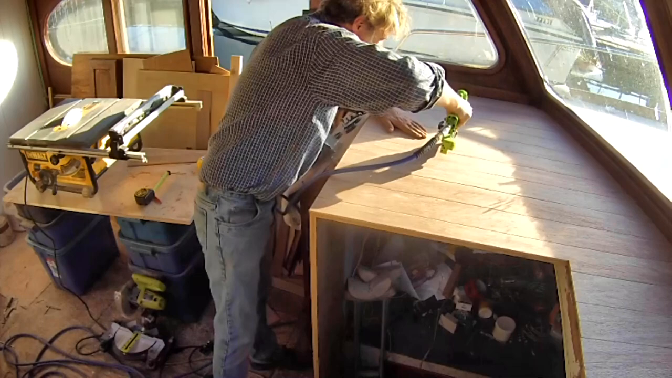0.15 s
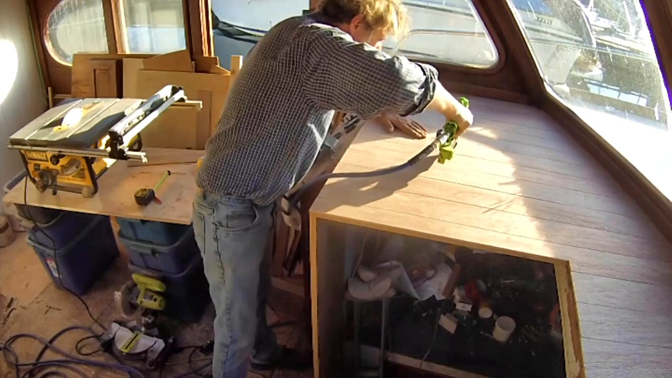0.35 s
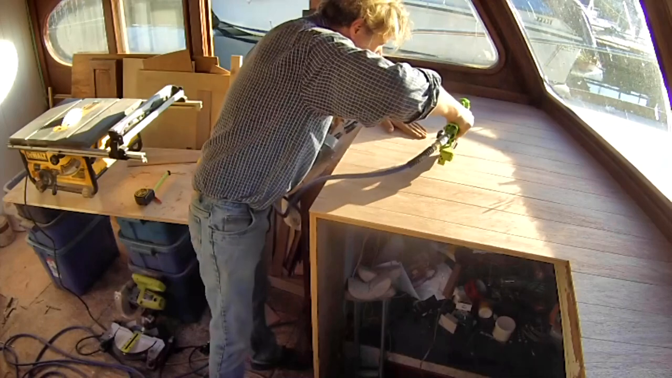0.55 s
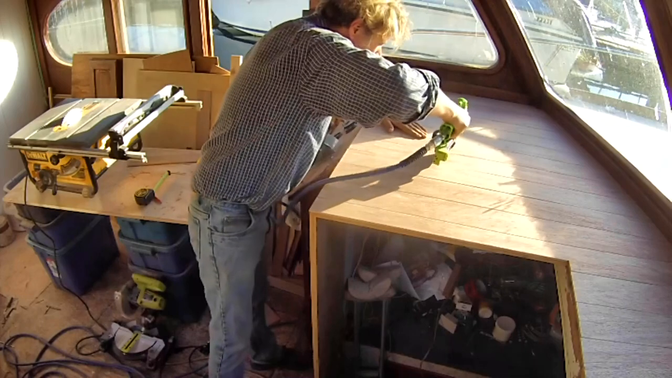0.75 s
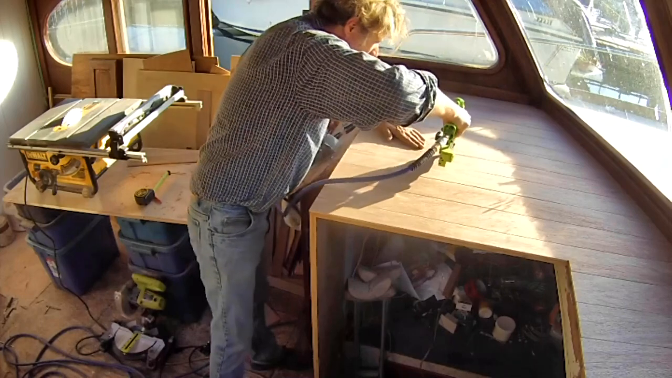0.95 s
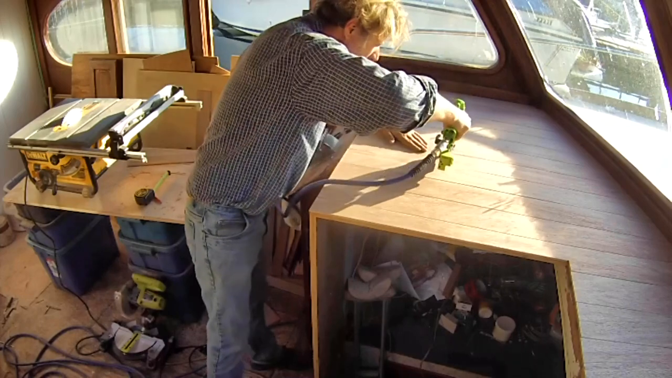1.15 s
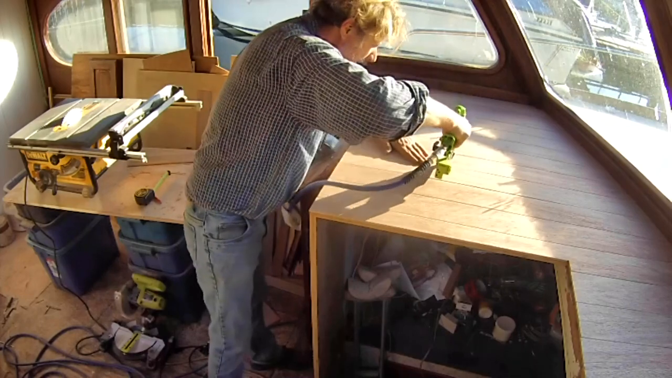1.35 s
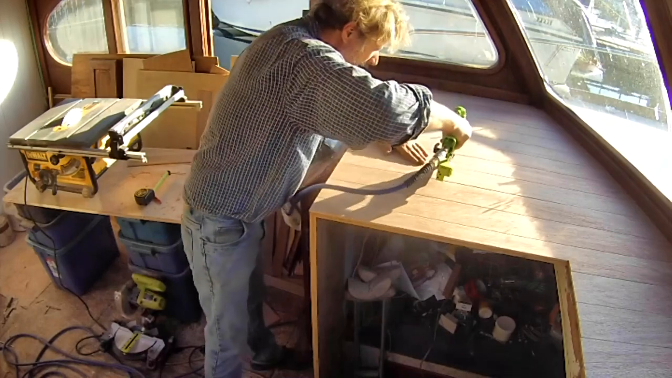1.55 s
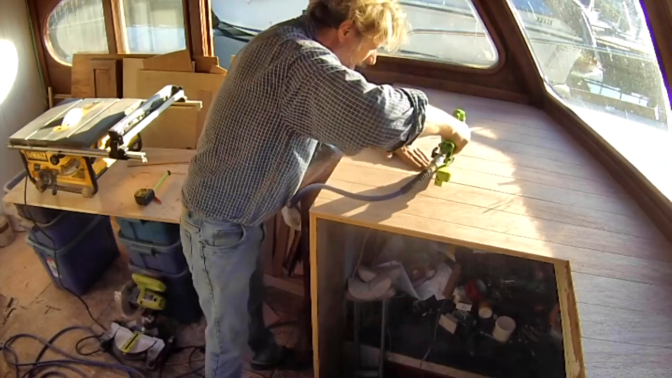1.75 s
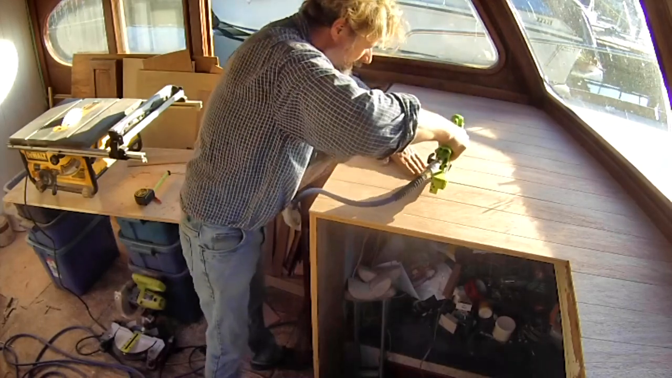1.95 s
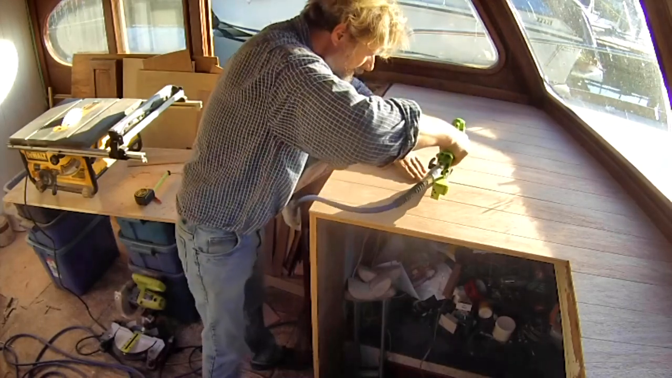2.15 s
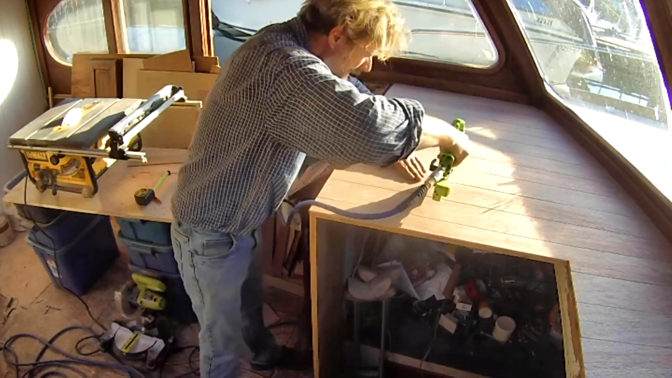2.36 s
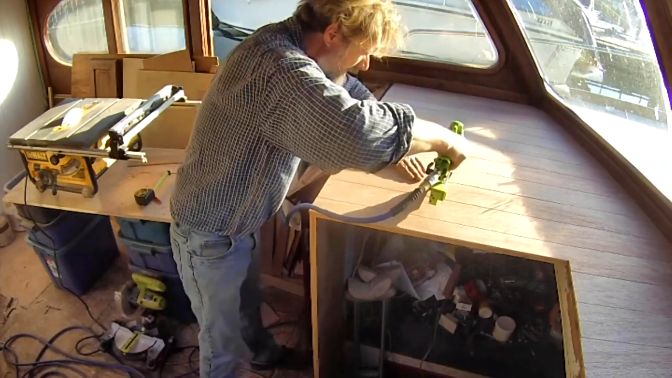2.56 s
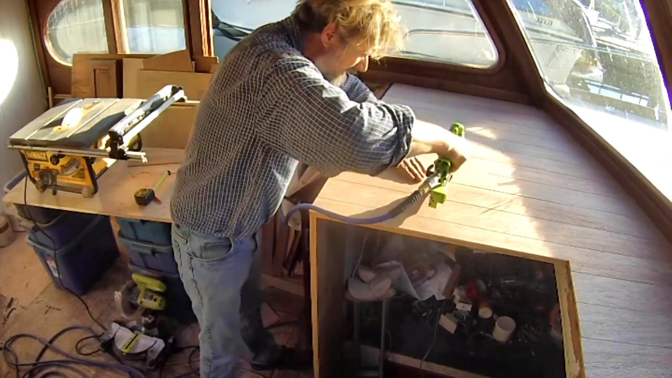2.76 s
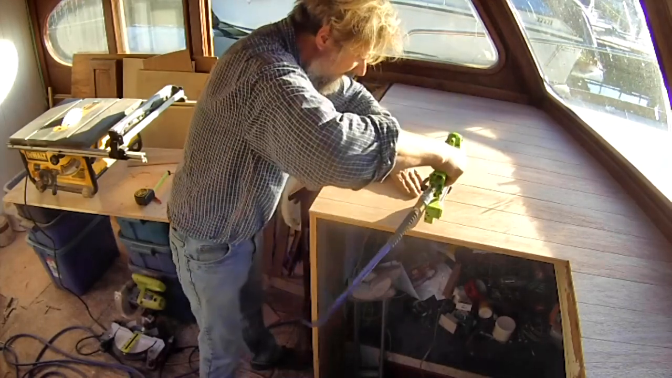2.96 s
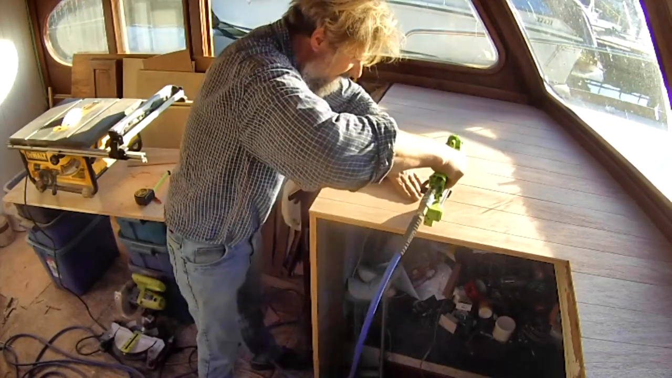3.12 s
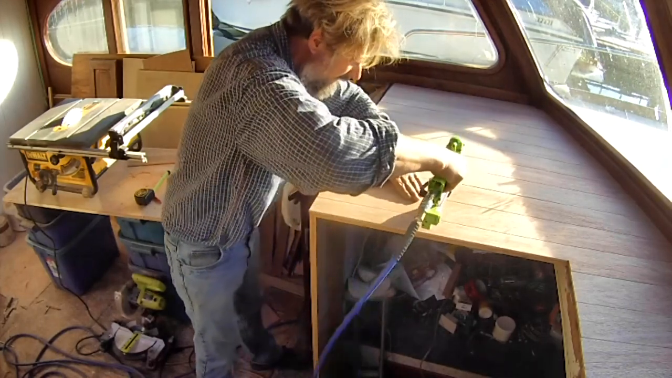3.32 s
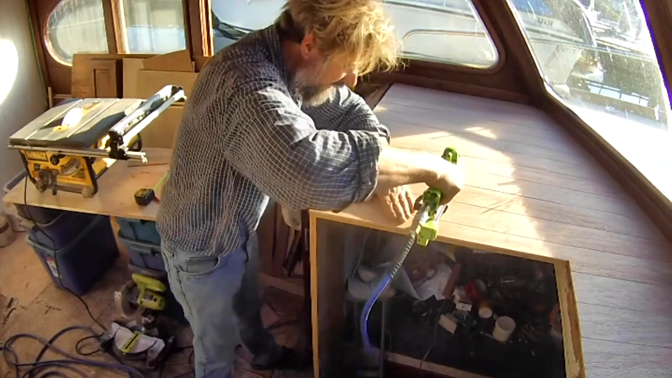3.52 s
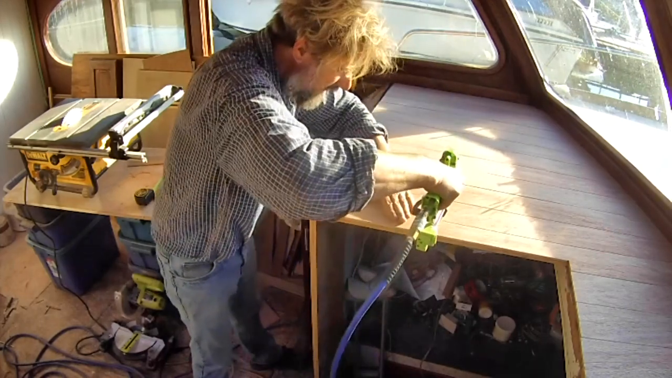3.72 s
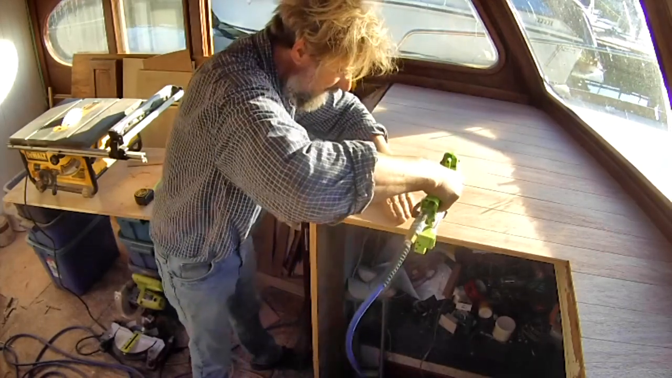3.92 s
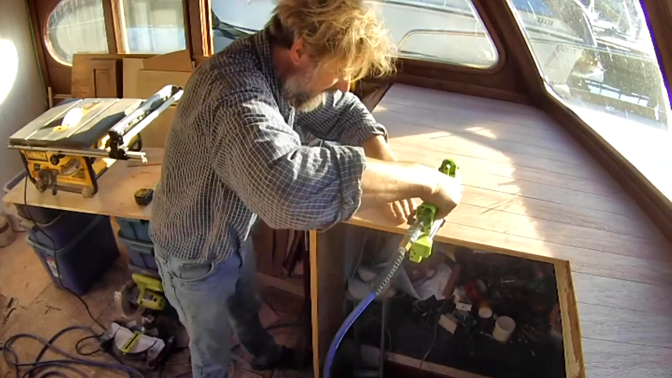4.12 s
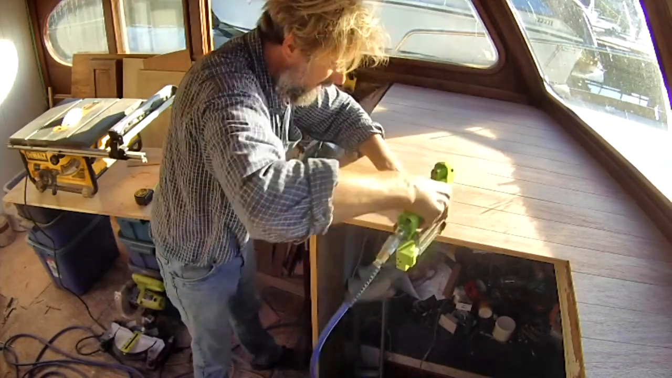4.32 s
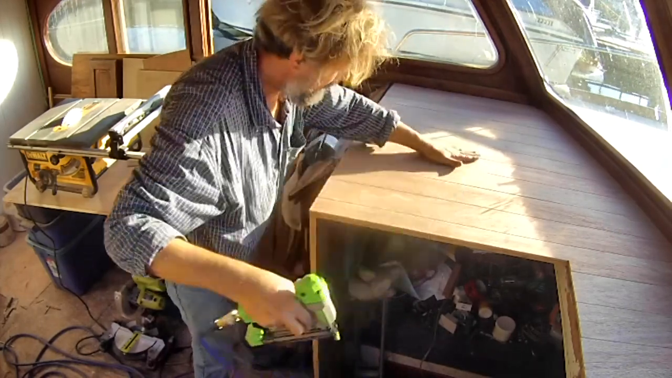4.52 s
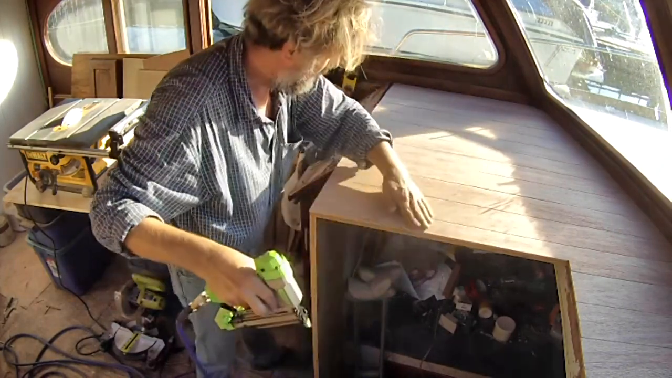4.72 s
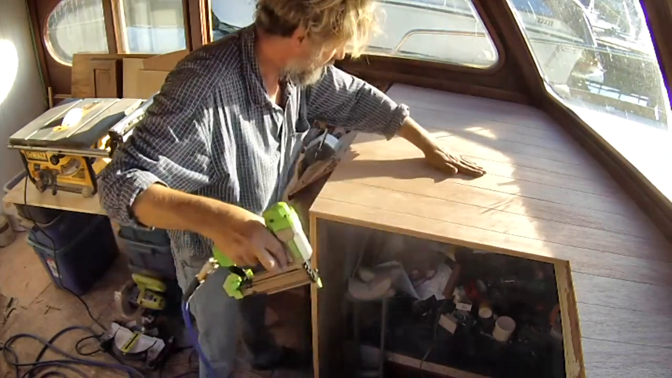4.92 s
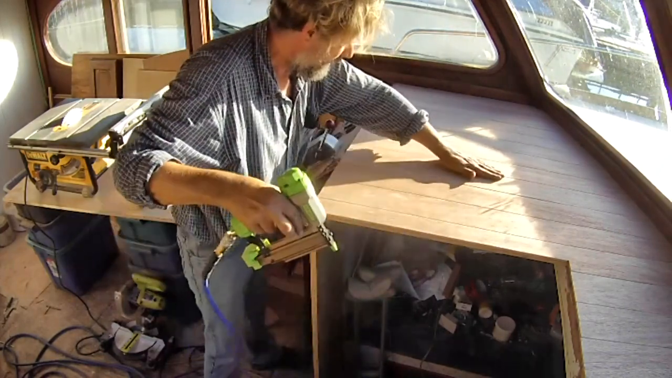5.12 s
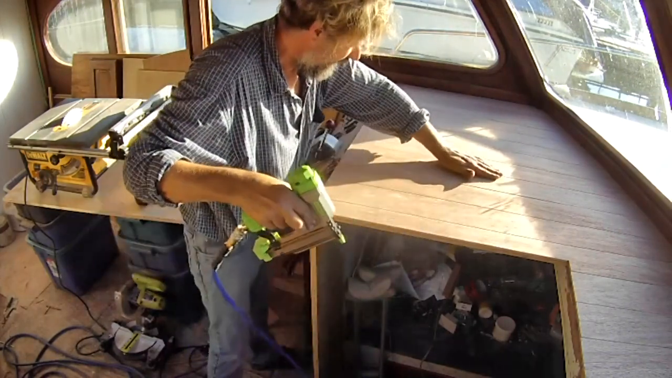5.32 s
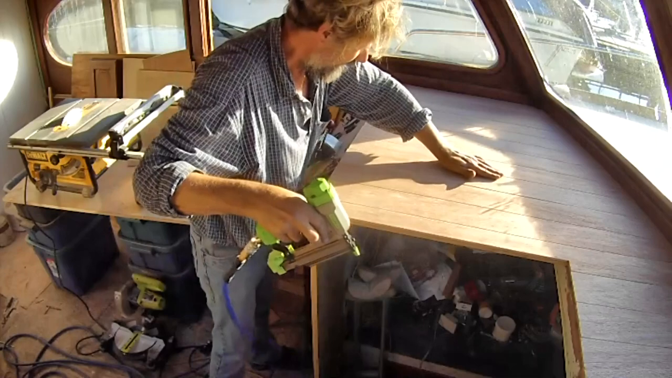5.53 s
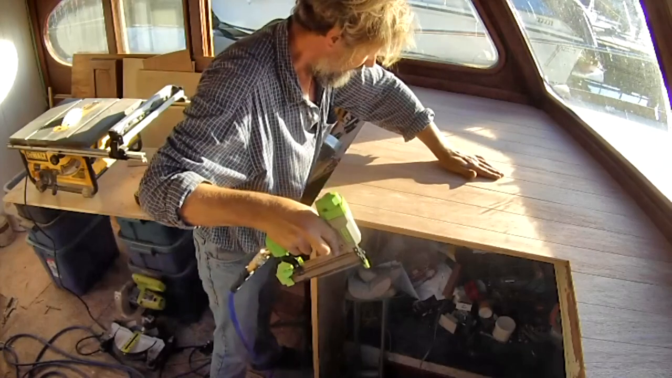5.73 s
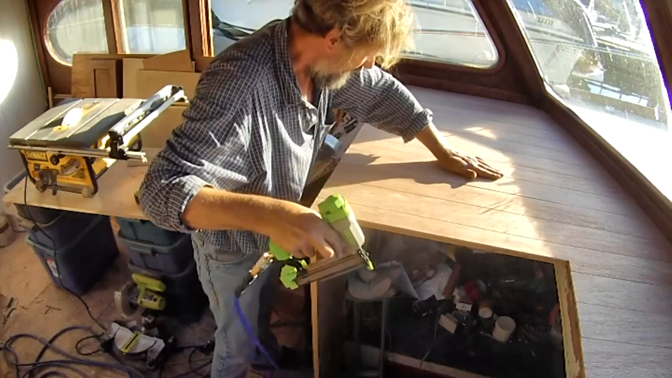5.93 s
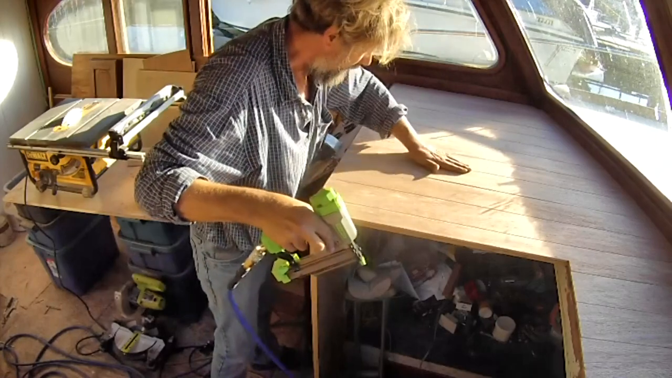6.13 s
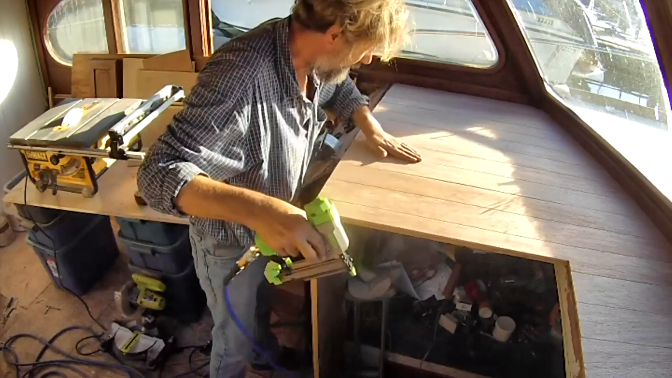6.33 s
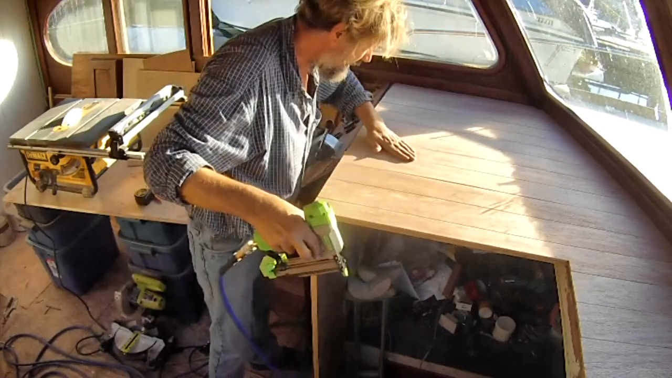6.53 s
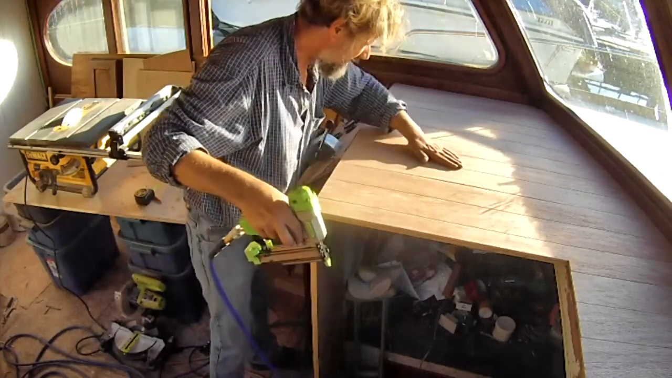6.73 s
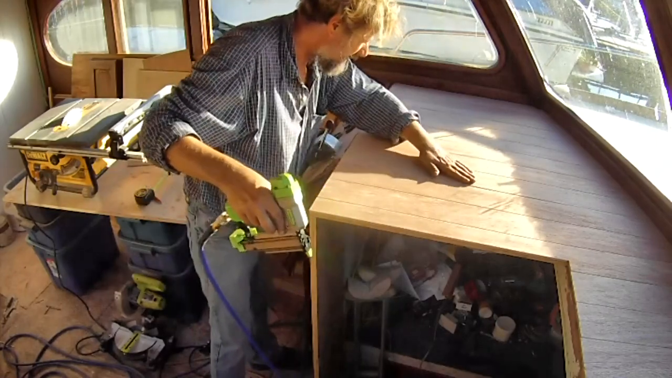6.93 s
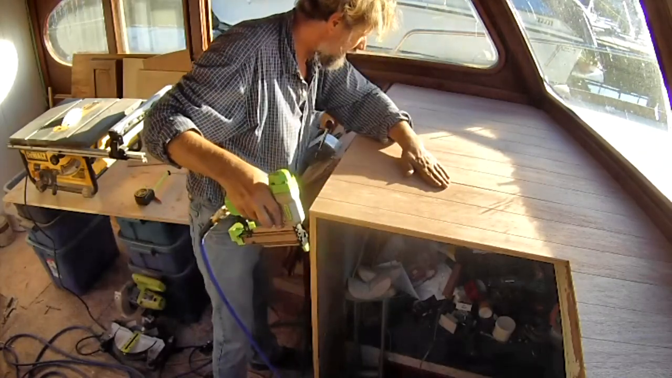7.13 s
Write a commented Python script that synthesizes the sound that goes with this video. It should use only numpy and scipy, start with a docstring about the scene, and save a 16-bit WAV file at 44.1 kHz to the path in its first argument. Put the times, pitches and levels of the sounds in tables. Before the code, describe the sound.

A small, tight-sounding boat cabin with low steady background noise; very faint, thin falling chirps come from outside during the first two seconds. It opens on the end of an air puff and a clack. At 0.2 s a pin nailer fires, then after a gap again at 0.8, 1.1, 1.5 and 1.8 s, continuing about every third of a second until 4.2 s, twelve shots in all. Each has a faint tick and air spit, a bright crack, and some 60 ms later an exhaust puff, a metallic piston clack and thin refill hiss, over short hollow wood thumps. The 1.5 s crack is weaker. A wooden bump lands at 2.2 s, and a brief scuff at 3.5 s. From 4.4 s a palm brushes the planks in uneven hissing strokes, fading near 5.5 s; a hard knock hits at 5.6 s, then soft bumps at 6.0 s and more rubbing to the end.

```python
"""A pneumatic pin nailer tacks planking onto a hollow wooden counter in a small boat cabin.
From the start: low background noise, faint outside chirps, the end of an earlier exhaust puff.
0.2 to 4.2 s: twelve shots, each a trigger tick, valve spit, driver crack, puff, piston clack and refill hiss
(filtered noise) over ringing wood modes; bumps, brief scuffs and hand shifts between some of them.
From 4.4 s: a palm sweeps over the planks as uneven noise, amid soft bumps and one hard knock at 5.6 s."""
import sys
import numpy as np
from scipy import signal
from scipy.fft import rfft, irfft, next_fast_len
from scipy.io import wavfile
from scipy.ndimage import map_coordinates

SR = 44100
rng = np.random.default_rng(int(sys.argv[2]) if len(sys.argv) > 2 else 0)


def generate_wav(sig):
    """Save sig (samples, or channels by samples) to the path in sys.argv[1] as 16-bit PCM at SR."""
    pcm = np.round(np.clip(np.atleast_2d(sig).T, -1, 1) * 32767).astype(np.int16)
    wavfile.write(sys.argv[1], SR, pcm)


N = 316354

# Levels of the hits (shots, releases, bumps) are set ahead of the trim in scene().
# Driver blows. Each row: start in seconds, crack level in dB, valve spit level in dB,
# counter thump level in dB, plank knock level in dB, plank pitch in Hz.
SHOTS = [(0.1787, -21, -36, -25.5, -31, 245), (0.8377, -24.5, -32.5, -22, -32, 370),
         (1.1309, -25.5, -32, -25.5, -30, 330), (1.513, -33.5, -30, -26.5, -32, 340),
         (1.801, -20, -30.5, -32.5, -25, 419.5), (2.2821, -20.5, -39.5, -32, -25.5, 480),
         (2.6716, -19.5, -33, -39, -27, 225), (2.9978, -21.5, -33, -31.5, -23.5, 235),
         (3.2834, -21.5, -35.5, -32.5, -23.5, 230), (3.613, -21, -39, -39, -27, 490),
         (3.913, -21, -39.5, -32, -27.5, 280), (4.242, -26.5, -32, -32.5, -22.5, 370)]
# Trigger releases. Each row: start in seconds, exhaust puff level in dB, refill hiss level in dB,
# piston return time in seconds, piston clack level in dB.
RELEASES = [(-.03, -26.5, -81.5, 0.022, -28.5), (0.239, -22.5, -49.5, 0.02, -28.5),
            (0.8963, -28.5, -52.5, .014, -26.5), (1.1861, -21.5, -51, 0.017, -23.5),
            (1.569, -30, -74, 0.016, -24), (1.859, -20, -45, 0.017, -28),
            (2.3371, -24.5, -59, .0234, -23.5), (2.728, -23, -42.5, 0.018, -29),
            (3.0558, -30, -65.5, 0.014, -24.5), (3.34, -25, -46, 0.021, -32.5),
            (3.672, -25.5, -71.5, 0.017, -27), (3.9728, -20, -77.5, 0.018, -25),
            (4.301, -29.5, -67, 0.013, -24)]
# Bumps on the woodwork. Each row: start in seconds, thump level in dB, knock level in dB,
# rap level in dB, t60 of the rap's slow part in seconds.
BUMPS = [(.722, -34.5, -47, -55.5, 0.32), (2.2343, -32, -22.5, -29, 0.1), (2.44, -47.5, -55.5, -64.5, .12),
         (4.069, -49, -52.5, -76, .09), (4.437, -48.5, -81, -78, 0.11), (4.576, -44, -59, -60, 0.072),
         (4.623, -52, -67, -49.5, 0.055), (4.728, -70, -75, -58.5, 0.058), (5.582, -26.5, -39, -21.5, 0.23),
         (5.998, -48, -49.5, -52, 0.39), (6.06, -32.5, -58, -59, .05)]
# Palm strokes, one list of points each. Each point: time in seconds, hiss level in dB.
PALM_STROKES = [
    [(4.38, -54), (4.504, -57), (4.552, -48), (4.67, -44), (4.71, -54)],
    [(4.73, -45), (4.774, -52.5), (4.922, -39), (5.286, -63.5), (5.52, -73)],
    [(5.97, -69.5), (5.986, -69), (6.086, -45), (6.434, -45), (6.53, -56.5)],
    [(6.54, -56.5), (6.608, -45.5), (6.904, -47.5), (7.116, -44.5), (7.17, -52.5)],
]
# Brief shifts of the hand on the planks. Each row: middle in seconds, half length in seconds, level in dB.
HAND_SHIFTS = [(.648, 0.039, -68.5), (.78, .05, -72), (2.122, 0.096, -71.5)]
# Drags as the tool moves to the next pin. Each row: middle in seconds, level in dB.
SCUFFS = [(1.329, -69), (2.004, -64), (2.469, -62.5), (3.46, -49.5), (3.77, -63)]
# Faint falling chirps from outside. Each row: middle in seconds, level in dB.
CHIRPS = [(.14, -82.5), (0.369, -71), (.59, -78), (1.36, -78), (2.04, -70.5)]

# Modes of the hollow counter. Each row: frequency in Hz, relative level in dB, t60 in seconds.
COUNTER_MODES = [(56, -8, 0.2), (72, 9, 0.046), (84.4, -4.5, 0.25), (116, 0, 0.068), (126, -13, 0.2)]
# Modes of the planks. Each row: frequency in Hz, relative level in dB, t60 in seconds.
PLANK_MODES = [(202, -3.5, 0.054), (240.7, -2, 0.095), (287, -2.5, .09), (337, -3.5, 0.063),
               (383.8, -4.5, 0.062), (430.2, -6.5, 0.11), (490, -1, .1), (520, -8.5, 0.14)]
# Resonances of the nailer housing. Each row: frequency in Hz, width in Hz, boost in dB at full share.
HOUSING_PEAKS = [(743, 70, 7.5), (898, 130, 5), (1277, 29, 8), (1505, 210, 5.5), (1868, 270, 8),
                 (2240, 130, 4.5), (2750, 120, 5.5), (3240, 300, 6), (4220, 620, 4.5), (5900, 300, 0.5),
                 (6600, 1100, 2.5), (8130, 500, 3), (9600, 380, 2)]
# Decay of the cabin echo. Each row: frequency in Hz, t60 in seconds.
WALL_T60 = [(100, 0.29), (500, 0.22), (2000, 0.14), (5000, 0.13), (14000, 0.067)]

# Spectrum of the driver crack. Each row: frequency in Hz, relative density in dB per Hz.
CRACK_SPECTRUM = [(100, -9), (400, -8.5), (700, -8), (1100, -4), (2500, -5), (3400, -5.5), (4400, 0),
                  (6000, -3.5), (9000, -4.5), (11000, -10.5), (15000, -13)]
# Spectrum of escaping air. Each row: frequency in Hz, relative density in dB per Hz.
AIR_SPECTRUM = [(40, -11), (90, 11), (200, -8.5), (500, 4.5), (700, -2.5), (1300, -6.5), (2300, -0.5),
                (4800, 1), (7000, -1), (9000, -0.5), (11800, -5.5), (13700, -0.5), (15500, -9)]
# Spectrum of the piston clack. Each row: frequency in Hz, relative density in dB per Hz.
PISTON_SPECTRUM = [(60, -8.5), (250, -9), (520, -5), (1100, -4), (1850, -3.5), (2400, -5.5), (3300, 1.5),
                   (5400, 1.5), (7000, -10), (9000, -6), (11000, -18), (15000, -22.5)]
# Spectrum of the plank's dense higher modes under a shot. Each row: frequency in Hz, relative dB per Hz.
PLANK_RAP_SPECTRUM = [(60, -11.5), (180, -6.5), (300, -4.5), (520, -3), (650, -5), (1000, -9), (1800, -7),
                      (3000, -11), (6000, -17.5), (15000, -29)]
# Spectrum of the rap of a bump. Each row: frequency in Hz, relative density in dB per Hz.
BUMP_RAP_SPECTRUM = [(60, -31.5), (180, -15.5), (300, 7), (560, -2.5), (780, 1), (1050, -6.5), (1450, -0.5),
                     (2000, -8), (2700, -12), (3300, -24.5), (4800, -22), (7000, -14.5), (10000, -23.5),
                     (15000, -21)]
# Spectrum of skin on wood grain. Each row: frequency in Hz, relative density in dB per Hz.
PALM_SPECTRUM = [(200, -25.5), (700, -15), (1000, -16), (1800, -3.5), (2800, 0.5), (4600, 0), (7100, 1.5),
                 (10000, -2.5), (14200, -7), (15500, -7.5)]
# Spectrum of the counter's rumble under the hand. Each row: frequency in Hz, relative dB per Hz.
RUMBLE_SPECTRUM = [(25, -12), (55, -3), (100, -2.5), (160, -13.5), (250, -11.5), (600, -18), (1500, -19.5),
                   (4000, -40)]
# Spectrum of the low background. Each row: frequency in Hz, relative density in dB per Hz.
BACKGROUND_SPECTRUM = [(25, 1.5), (60, 0), (110, -2), (170, -10.5), (370, -16.5), (800, -20.5), (1500, -23),
                       (2600, -26.5), (6000, -35.5), (11000, -41), (15500, -45)]

TOP_HZ = 15400
HIT_S = np.arange(SR // 2) / SR  # time axis of one hit

CHIRP_HZ = 2600  # pitch at the middle of a chirp
SCUFF_HALF_S, SCUFF_HZ = 0.025, 505

# Ordinary stroke, rumble under it, dB of rumble per dB of hiss, rumble under the leaning hand.
STROKE_REF_DB, RUMBLE_DB, RUMBLE_DB_PER_DB, LEAN_DB = -45.5, -66.5, 2.2, -59.5

# Plank pitch when rap equals knock; extra rap that lifts it an octave.
BUMP_HZ, BUMP_DB_PER_OCTAVE = 241, 17

# Hard return, its tilt, tilt gained per dB; thump of the jolt, the same at every return.
CLACK_REF_DB, CLACK_TILT_DB_PER_OCTAVE, CLACK_TILT_PER_DB = -23, -0.06, 0.42
JOLT_DB = -35.5

# Brisk release: level, rise, decay, tilt; weakening that doubles the decay; tilt gained per dB.
PUFF_REF_DB, PUFF_RISE_S, PUFF_T60_S, PUFF_TILT_DB_PER_OCTAVE = -21, 0.0019, 0.061, 2
PUFF_DOUBLING_DB, PUFF_TILT_PER_DB = 10, 0.12

# Ordinary spit, lead of its tick, extra spit that doubles the lead; tick relative to spit.
SPIT_REF_DB, TICK_LEAD_S, LEAD_DOUBLING_DB, TICK_DB = -32, 0.02, 17.5, -11.5
# Full blow, its tilt, tilt gained per dB.
CRACK_REF_DB, CRACK_TILT_DB_PER_OCTAVE, CRACK_TILT_PER_DB = -18.5, -0.5, 0.17
# Plank rap under a full blow; dB of rap gained per dB of crack lost, as when a pin meets hard wood.
RAP_DB, RAP_DB_PER_DB = -26.5, 0.22


def amp(db):
    """Decibels to gain."""
    return 10 ** (np.asarray(db) / 20)


def unit(x):
    """Scale to rms 1."""
    return x / np.sqrt(np.mean(x ** 2) + 1e-20)


def packed(x):
    """Scale a hit to the energy of 10 ms at rms 1."""
    return x / np.sqrt(np.sum(x ** 2) / (SR / 100) + 1e-20)


def along(points, hz):
    """Interpolate (Hz, value) points on a log frequency axis."""
    point_hz, values = np.transpose(points)
    return np.interp(np.log(hz + 1), np.log(point_hz), values)


def fade(t60_s):
    """Exponential decay, 60 dB in t60_s."""
    return np.exp(-np.log(1000) * HIT_S / np.maximum(t60_s, 1e-3))


def swell(rise_s):
    """Smooth onset from zero."""
    return 1 - np.exp(-(HIT_S / max(rise_s, 1e-4)) ** 2)


def white():
    """Fresh white noise, one hit long."""
    return rng.standard_normal(len(HIT_S))


def add(track, start_s, x):
    """Mix x into the track at start_s, cut to the track's ends."""
    start = round(start_s * SR)
    x = x[max(-start, 0):N - start]
    track[max(start, 0):][:len(x)] += x


def coloured(x, spectrum, housing=0, tilt_db=0):
    """Minimum-phase filter: spectrum, a share of the housing peaks, tilt in dB per octave over 500 Hz."""
    n = len(HIT_S)
    hz = np.fft.rfftfreq(n, 1 / SR)
    peaks_db = sum(db / (1 + (2 * (hz - f) / width) ** 2) for f, width, db in HOUSING_PEAKS)
    octaves = np.log2(np.maximum(hz, 500) / 500)
    gain = amp(along(spectrum, hz) + housing * peaks_db + tilt_db * octaves)
    # fold the cepstrum to its causal half; packed() absorbs the overall gain
    cepstrum = irfft(np.log(gain), n)
    response = np.exp(rfft(2 * cepstrum[:n // 2], n))
    return packed(irfft(rfft(x) * response, n))


def rush(spectrum):
    """Steady noise of rms 1 with the given spectrum."""
    n = next_fast_len(N, real=True)
    gain = amp(along(spectrum, np.fft.rfftfreq(n, 1 / SR)))
    noise = rng.standard_normal(n)
    return unit(irfft(rfft(noise) * gain, n)[:N])


def wobble(knots_per_s):
    """Smooth random curve through normal knots."""
    knots = rng.standard_normal(int(N * knots_per_s / SR) + 4)
    return map_coordinates(knots, [np.arange(N) * knots_per_s / SR])


def ring(modes, rise_s, scatter_db, detune):
    """Sum of decaying wood modes; level, pitch and phase scatter with where the blow lands."""
    out = 0
    for hz, db, t60_s in modes:
        level_draw, pitch_draw, phase = rng.standard_normal(3)
        mode_hz = hz * (1 + detune * pitch_draw)
        tone = np.sin(2 * np.pi * (mode_hz * HIT_S + phase))
        out = out + amp(db + scatter_db * level_draw) * fade(t60_s) * tone
    return packed(swell(rise_s) * out)


def wood(thump_db, knock_db, knock_hz):
    """A blow rings the hollow counter and the plank on top, whose modes near knock_hz answer most."""
    plank_modes = [(hz, db - 9 * abs(np.log2(hz / knock_hz)), t60_s) for hz, db, t60_s in PLANK_MODES]
    thump = ring(COUNTER_MODES, 0.0029, scatter_db=1.0, detune=0.061)
    knock = ring(plank_modes, 0.003, scatter_db=2.5, detune=0.028)
    return amp(thump_db) * thump + amp(knock_db) * knock


def background():
    """Low steady noise of slowly wavering level."""
    return amp(-64 + 1.1 * wobble(2.6)) * rush(BACKGROUND_SPECTRUM)


def chirps():
    """Thin, broken far-off tones that sag in pitch."""
    t = np.arange(N) / SR
    waver = 0.012 * wobble(130)
    out = np.zeros(N)
    for middle_s, db in CHIRPS:
        dt = t - middle_s
        pitch_hz = CHIRP_HZ * (1 - 0.34 * dt - 4 * dt ** 2 + waver)
        tone = np.sin(2 * np.pi * np.cumsum(pitch_hz) / SR)
        out += amp(db) * np.exp(-(dt / 0.066) ** 2) * tone
    return out * amp(2 * wobble(70))


def scuffs():
    """Sleeve and hose drag as the tool moves on: short bursts of rough noise around SCUFF_HZ."""
    t = np.arange(N) / SR
    drags = sum(amp(db) * np.exp(-((t - middle_s) / SCUFF_HALF_S) ** 2) for middle_s, db in SCUFFS)
    spectrum = [(SCUFF_HZ / 6, -20), (SCUFF_HZ, 0), (SCUFF_HZ * 2, -9), (SCUFF_HZ * 12, -45)]
    return drags * amp(1.4 * wobble(81)) * rush(spectrum)


def palm():
    """Skin slides on wood grain with an uneven hiss; the counter rumbles more under a firmer stroke."""
    t = np.arange(N) / SR
    point_s, point_db = np.concatenate(PALM_STROKES).T
    stroke_db = np.interp(t, point_s, point_db)
    touching = np.clip((t - point_s[0]) / 0.035 + 1, 0, 1)
    shifts = sum(amp(db) * np.exp(-((t - middle_s) / half_s) ** 2) for middle_s, half_s, db in HAND_SHIFTS)
    hiss = (touching * amp(stroke_db) + shifts) * amp(wobble(39)) * rush(PALM_SPECTRUM)
    shake = amp(LEAN_DB) + amp(RUMBLE_DB + RUMBLE_DB_PER_DB * (stroke_db - STROKE_REF_DB))
    rumble = touching * shake * amp(0.58 * wobble(28)) * rush(RUMBLE_SPECTRUM)
    return hiss + rumble


def bumps():
    """Tool nose and body bump the woodwork; more rap against knock favours higher plank modes."""
    out = np.zeros(N)
    for start_s, thump_db, knock_db, rap_db, t60_s in BUMPS:
        knock_hz = BUMP_HZ * 2 ** ((rap_db - knock_db) / BUMP_DB_PER_OCTAVE)
        contact = white() * (fade(t60_s) + 2.4 * fade(0.015))
        rap = coloured(contact, BUMP_RAP_SPECTRUM, tilt_db=0.5)
        add(out, start_s, wood(thump_db, knock_db, knock_hz) + amp(rap_db) * rap)
    return out


def piston():
    """The returning piston strikes the housing, brighter when harder, and jolts the wood below."""
    out = np.zeros(N)
    for start_s, _, _, return_s, db in RELEASES:
        clack_s = start_s + return_s
        contact = white() * (fade(0.006) + 0.62 * fade(0.065))
        tilt_db = CLACK_TILT_DB_PER_OCTAVE + CLACK_TILT_PER_DB * (db - CLACK_REF_DB)
        add(out, clack_s, amp(db) * coloured(contact, PISTON_SPECTRUM, housing=1.1, tilt_db=tilt_db))
        add(out, clack_s - 0.004, wood(thump_db=JOLT_DB, knock_db=JOLT_DB - 1.5, knock_hz=480))
    return out


def exhaust():
    """The cylinder dumps air in a puff, longer and duller when weak; a thin hiss refills the tool."""
    out = np.zeros(N)
    refill_shape = swell(0.026) / (1 + (HIT_S / 0.15) ** 20) * fade(0.96)  # shuts at 0.15 s
    for start_s, db, refill_db, _, _ in RELEASES:
        t60_s = PUFF_T60_S * 2 ** ((PUFF_REF_DB - db) / PUFF_DOUBLING_DB)
        tilt_db = PUFF_TILT_DB_PER_OCTAVE + PUFF_TILT_PER_DB * (db - PUFF_REF_DB)
        burst = white() * swell(PUFF_RISE_S) * fade(t60_s)
        puff = coloured(burst, AIR_SPECTRUM, housing=1.0, tilt_db=tilt_db)
        refill = coloured(white() * refill_shape, AIR_SPECTRUM, housing=0.7, tilt_db=-2.0)
        add(out, start_s, amp(db) * puff)
        add(out, start_s, amp(refill_db) * refill)
    return out


def shots():
    """The trigger ticks, the valve spits, the driver hits the pin, then bottoms on its bumper."""
    out = np.zeros(N)
    # bumper chatter lasts a few ms, then stops dead over a weak tail
    chatter = swell(0.0009) / (1 + (HIT_S / 0.0053) ** 4)
    bumper_shape = chatter + 0.098 * fade(0.15)
    for start_s, crack_db, spit_db, thump_db, knock_db, knock_hz in SHOTS:
        # a slow squeeze ticks earlier and spits more air
        lead_s = TICK_LEAD_S * 2 ** ((spit_db - SPIT_REF_DB) / LEAD_DOUBLING_DB)
        tick = coloured(white() * swell(0.015) * fade(0.18), AIR_SPECTRUM)
        add(out, start_s - lead_s, amp(spit_db + TICK_DB) * tick)
        spit = coloured(white() * swell(0.0075) * fade(0.055), AIR_SPECTRUM, housing=0.6)
        add(out, start_s - 0.0052, amp(spit_db) * spit)

        tilt_db = CRACK_TILT_DB_PER_OCTAVE + CRACK_TILT_PER_DB * (crack_db - CRACK_REF_DB)
        pin_hit = coloured(white() * fade(0.011), CRACK_SPECTRUM, housing=2.0, tilt_db=tilt_db - 1.5)
        add(out, start_s, amp(crack_db - 6.5) * pin_hit)
        bumper = coloured(white() * bumper_shape, CRACK_SPECTRUM, housing=0.46, tilt_db=tilt_db)
        add(out, start_s + 0.0028, amp(crack_db) * bumper)

        # a few low wood modes plus a dense mass of higher ones
        rap_db = RAP_DB + RAP_DB_PER_DB * (CRACK_REF_DB - crack_db)
        rap = coloured(white() * swell(0.0013) * fade(0.094), PLANK_RAP_SPECTRUM, housing=0.42)
        add(out, start_s, wood(thump_db, knock_db, knock_hz) + amp(rap_db) * rap)
    return out


def cabin(x, wet_db, early_db):
    """Close walls and windows throw back a dense cluster of echoes and a short tail."""
    hz, t, bins = signal.stft(white(), SR, nperseg=256)
    decay = np.exp(-np.log(1000) * t / along(WALL_T60, hz)[:, None])
    tail = signal.istft(bins * decay, SR, nperseg=256)[1][:len(HIT_S)] * swell(0.0081)
    early = white() ** 3 * swell(0.0019) * fade(0.084)  # cubing makes the noise spiky
    echo = amp(wet_db) * tail / np.linalg.norm(tail) + amp(early_db) * early / np.linalg.norm(early)
    return x + signal.fftconvolve(x, echo)[:N]


def scene():
    """Hits with an echo redrawn per shot as the worker moves; palm, scuffs and background stay dry."""
    hits = shots() + exhaust() + piston() + bumps()
    place_starts_s = [row[0] - 0.02 for row in SHOTS[1:]]
    place = np.searchsorted(place_starts_s, np.arange(N) / SR)
    heard = sum(cabin(hits * (place == k), wet_db=-17.5, early_db=-12.5) for k in range(len(SHOTS)))
    return (background() + chirps() + scuffs() + palm() + amp(-0.55) * heard)[None]


def record(dry):
    """Steep zero-phase low-pass at TOP_HZ."""
    n = next_fast_len(N + len(HIT_S), real=True)
    hz = np.fft.rfftfreq(n, 1 / SR)
    return irfft(rfft(dry, n) / np.sqrt(1 + (hz / TOP_HZ) ** 200), n)[:, :N]


dry = scene()
out = record(dry)
generate_wav(out)
```